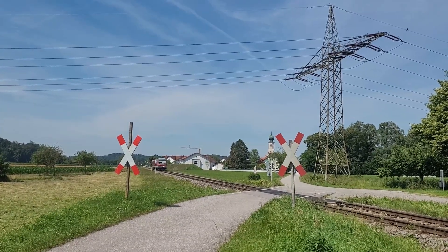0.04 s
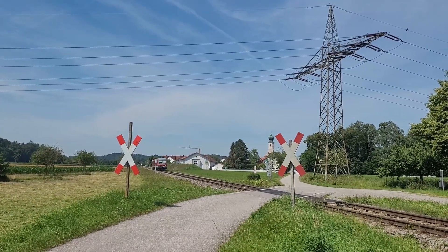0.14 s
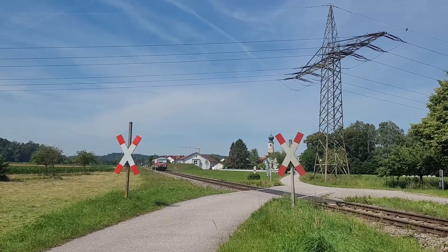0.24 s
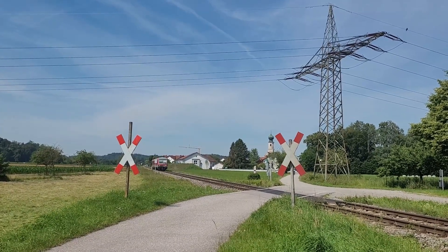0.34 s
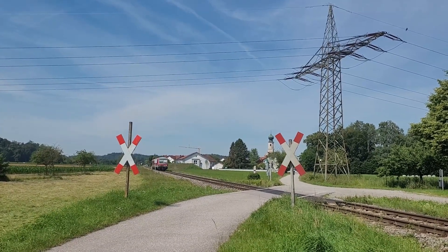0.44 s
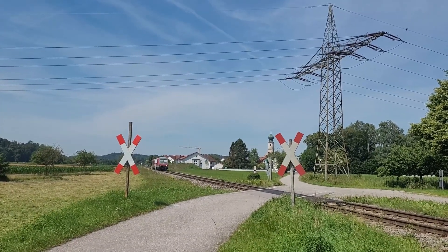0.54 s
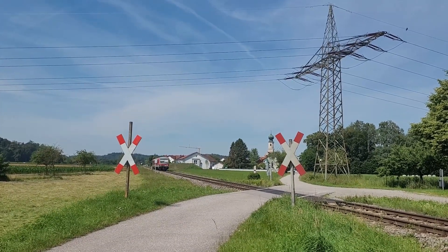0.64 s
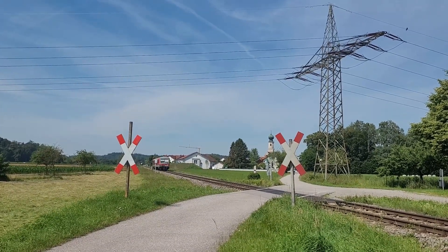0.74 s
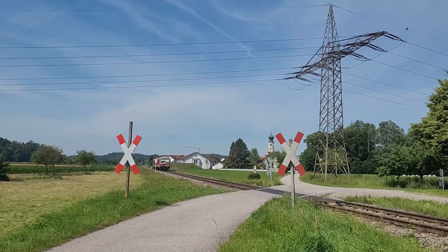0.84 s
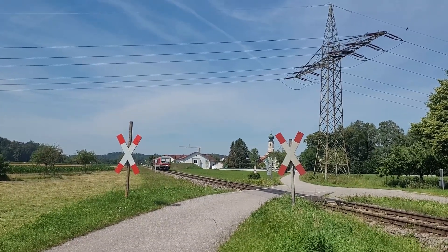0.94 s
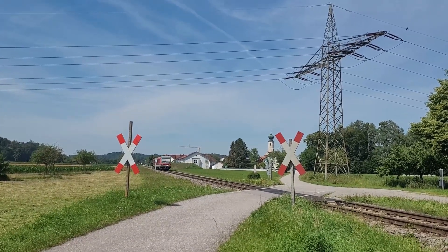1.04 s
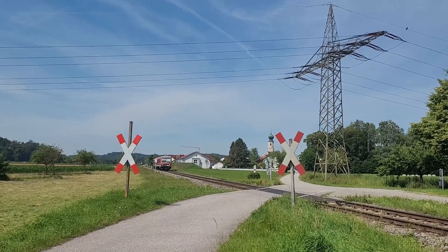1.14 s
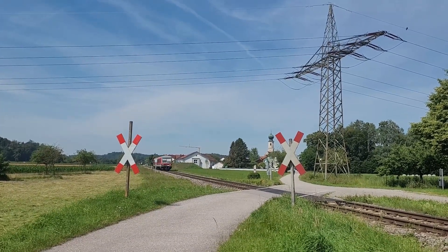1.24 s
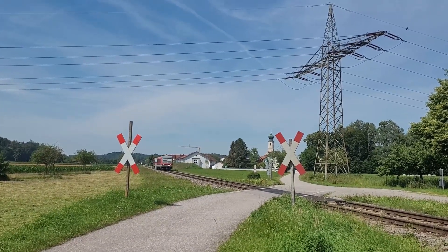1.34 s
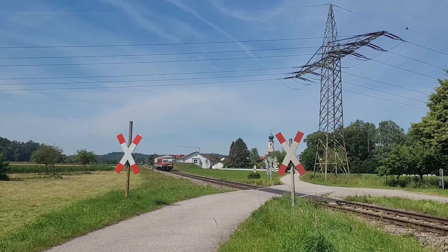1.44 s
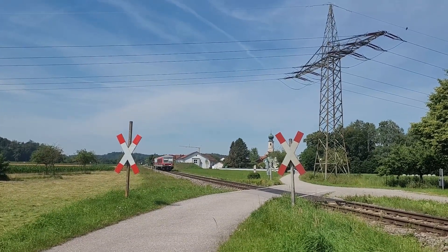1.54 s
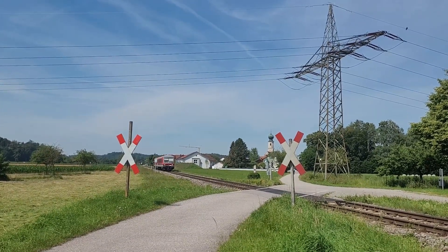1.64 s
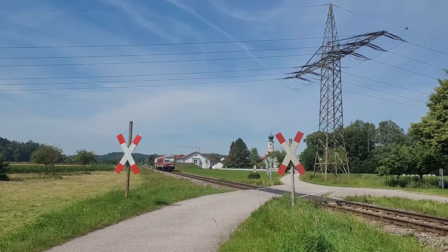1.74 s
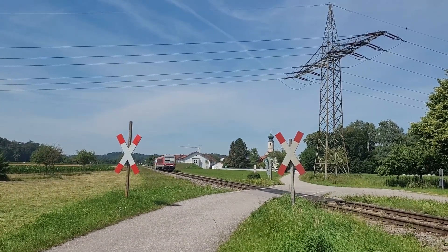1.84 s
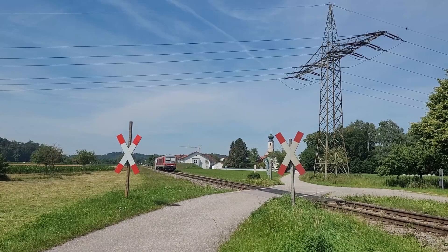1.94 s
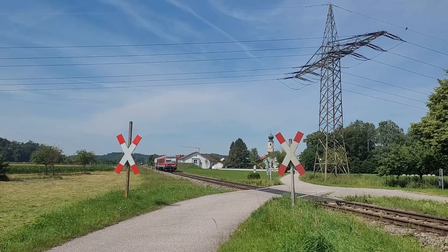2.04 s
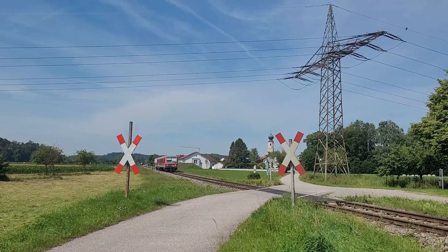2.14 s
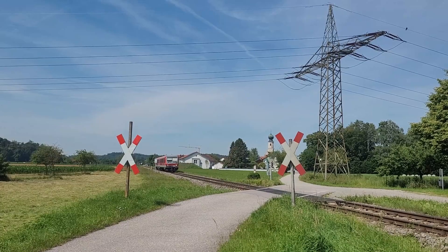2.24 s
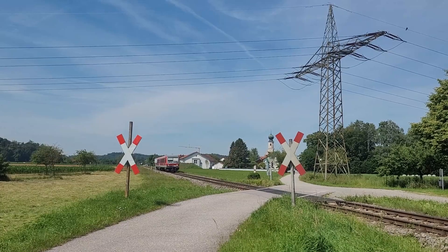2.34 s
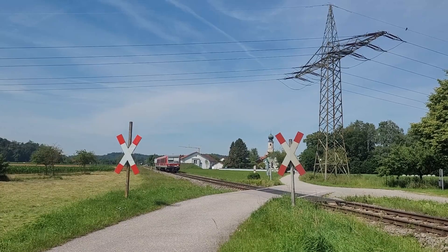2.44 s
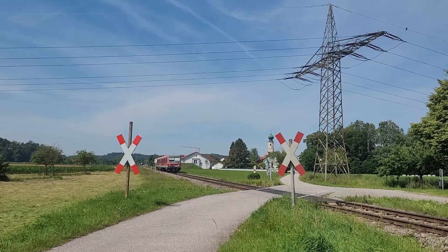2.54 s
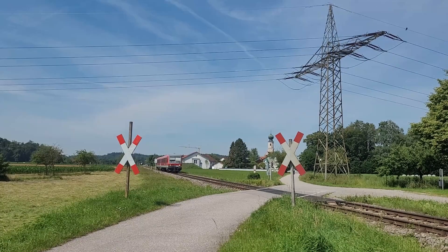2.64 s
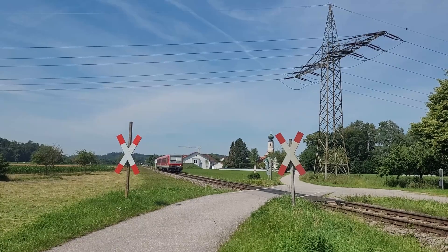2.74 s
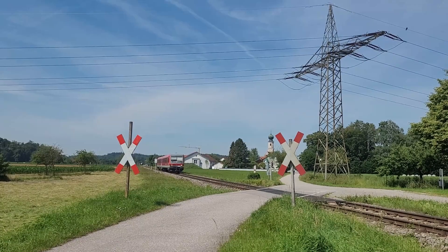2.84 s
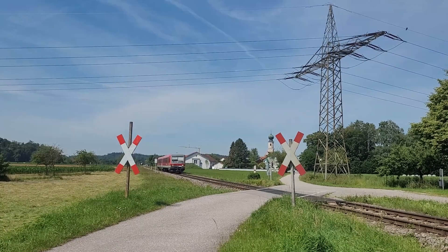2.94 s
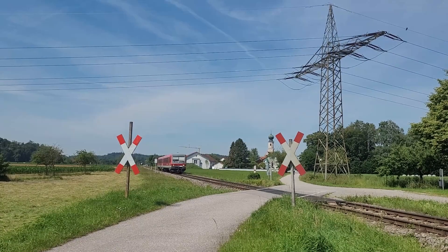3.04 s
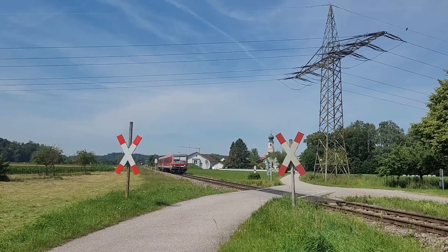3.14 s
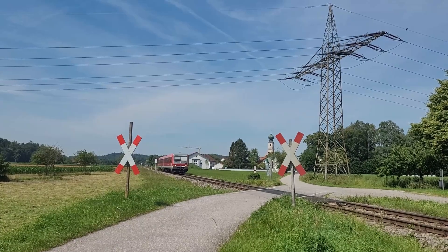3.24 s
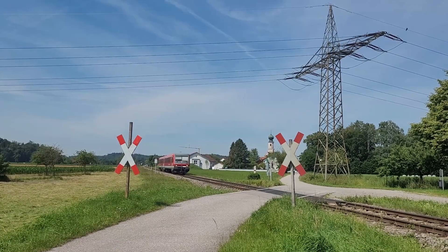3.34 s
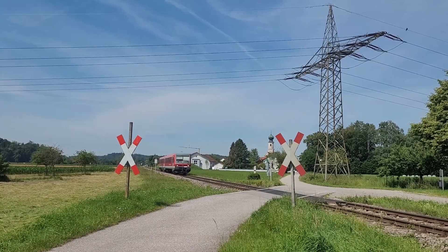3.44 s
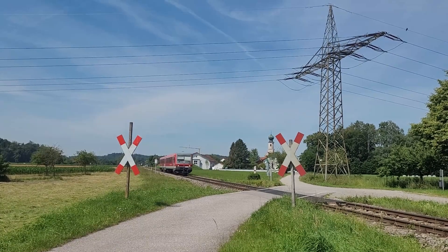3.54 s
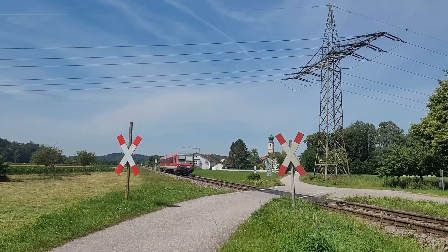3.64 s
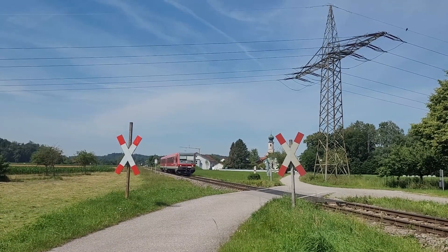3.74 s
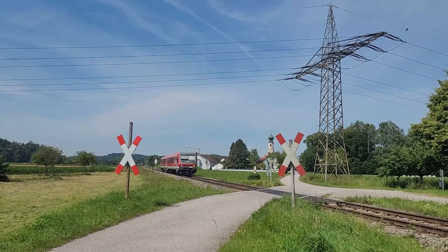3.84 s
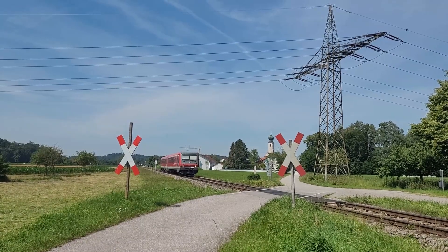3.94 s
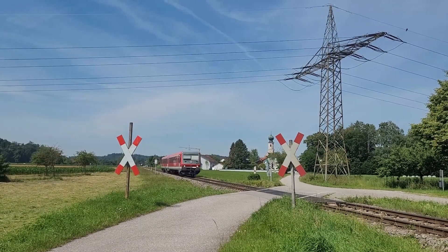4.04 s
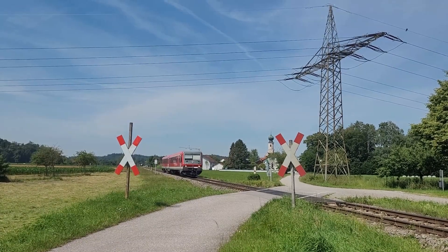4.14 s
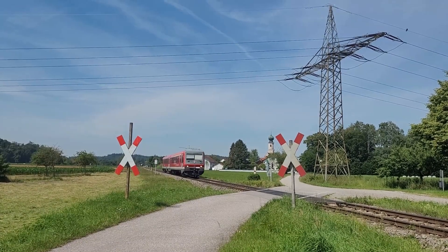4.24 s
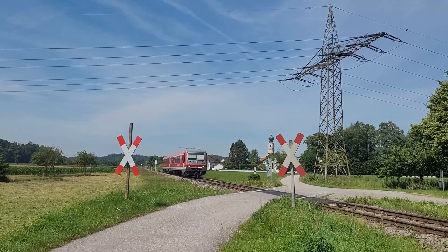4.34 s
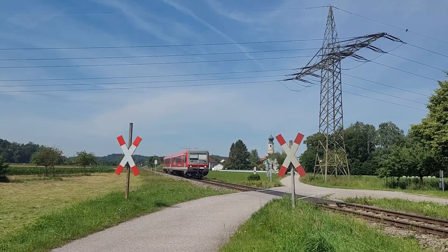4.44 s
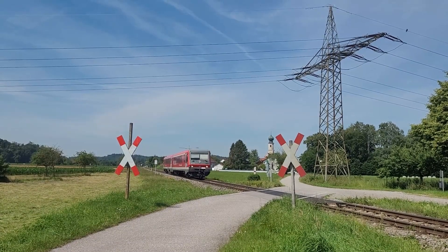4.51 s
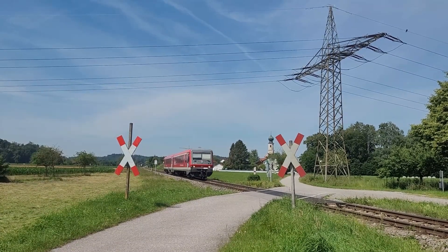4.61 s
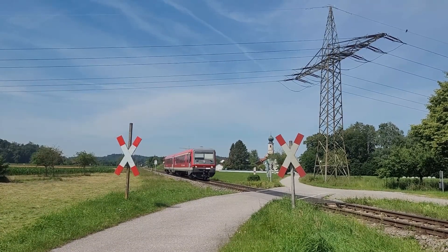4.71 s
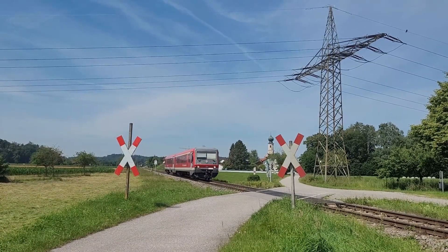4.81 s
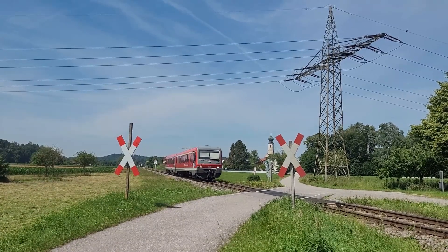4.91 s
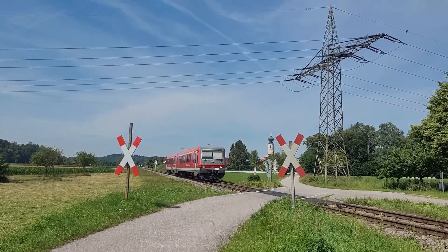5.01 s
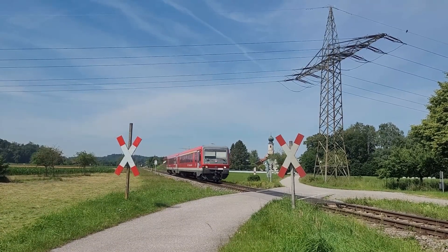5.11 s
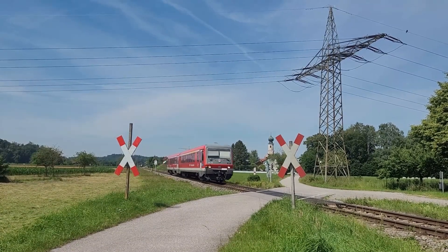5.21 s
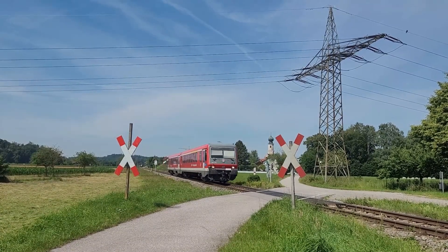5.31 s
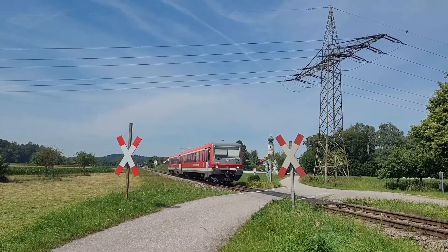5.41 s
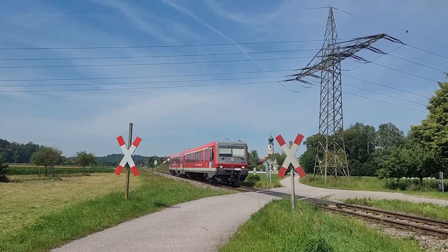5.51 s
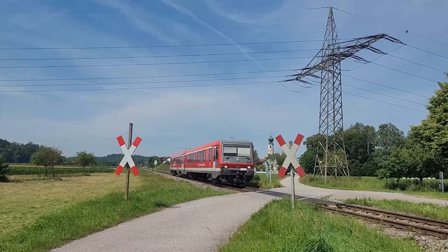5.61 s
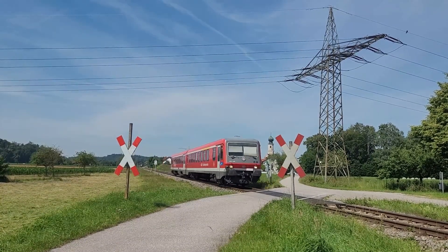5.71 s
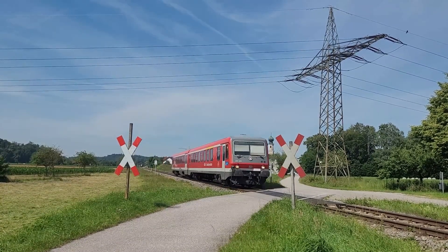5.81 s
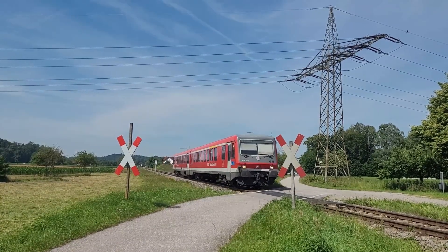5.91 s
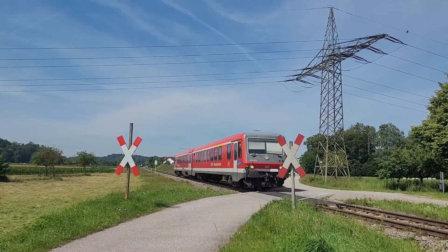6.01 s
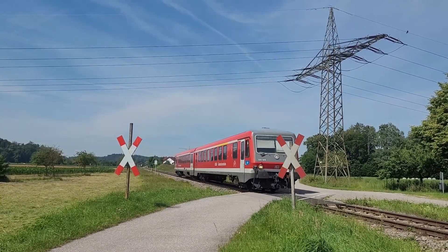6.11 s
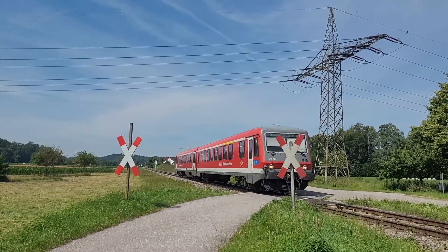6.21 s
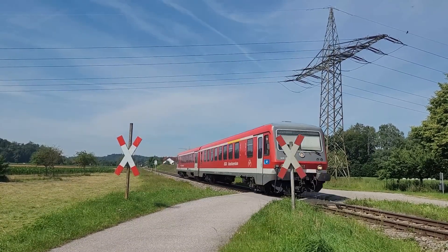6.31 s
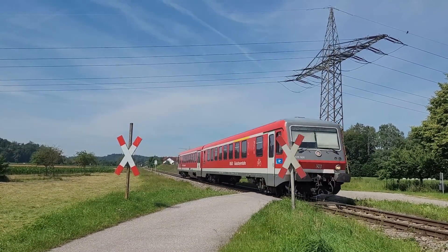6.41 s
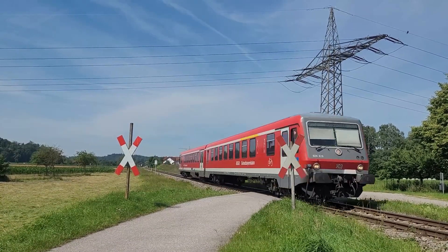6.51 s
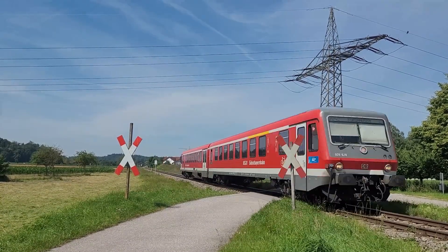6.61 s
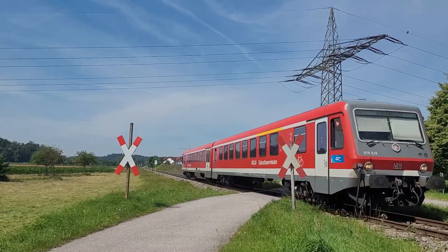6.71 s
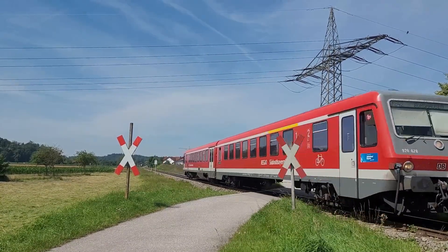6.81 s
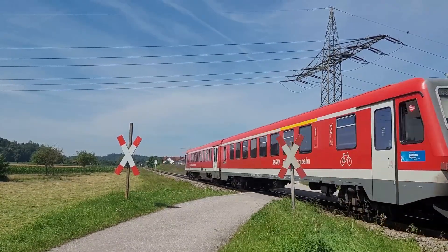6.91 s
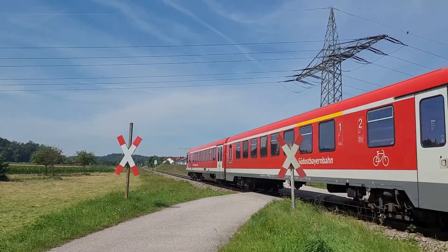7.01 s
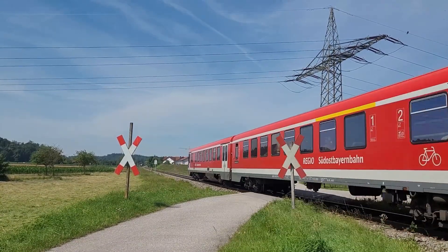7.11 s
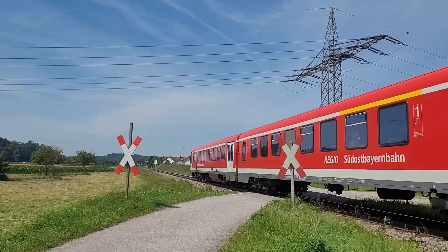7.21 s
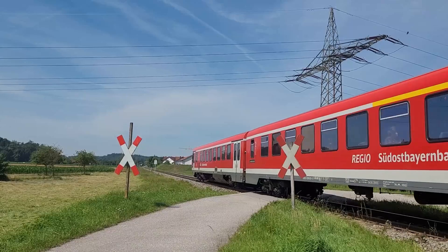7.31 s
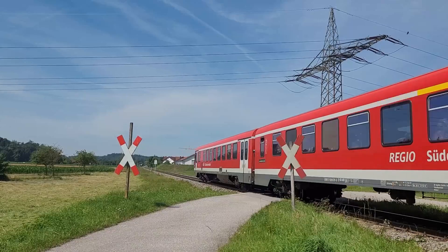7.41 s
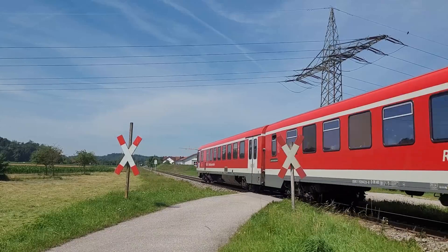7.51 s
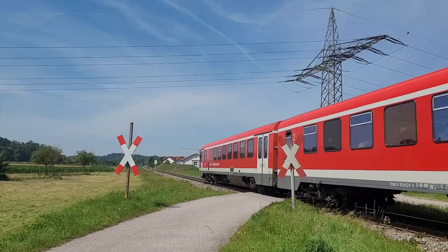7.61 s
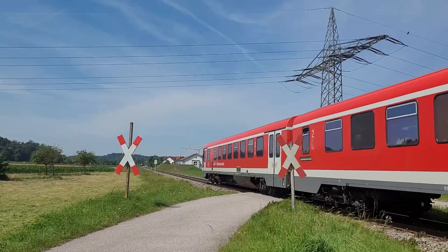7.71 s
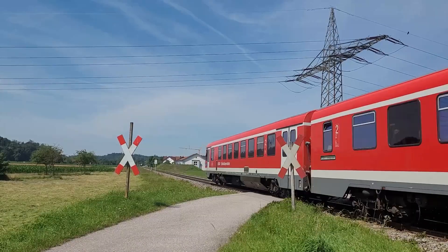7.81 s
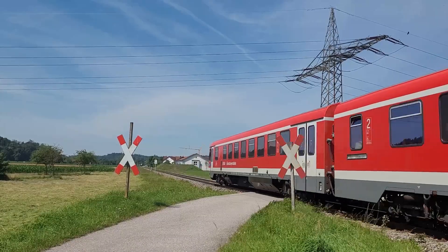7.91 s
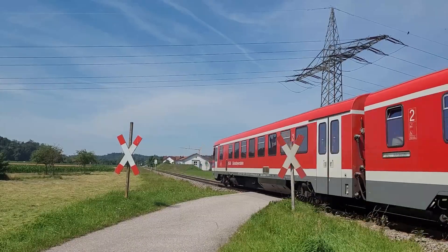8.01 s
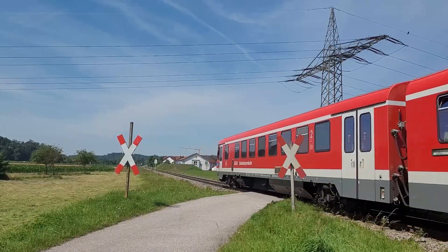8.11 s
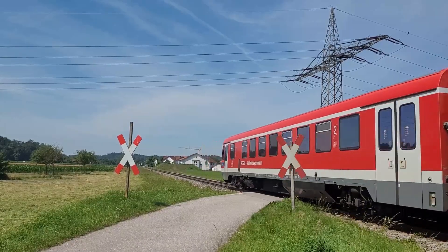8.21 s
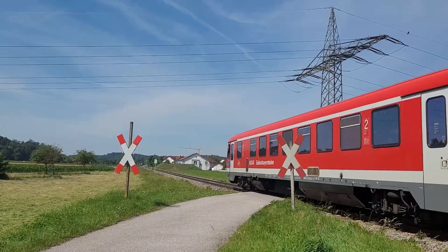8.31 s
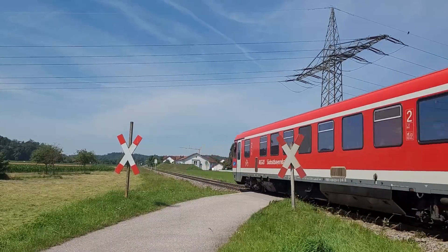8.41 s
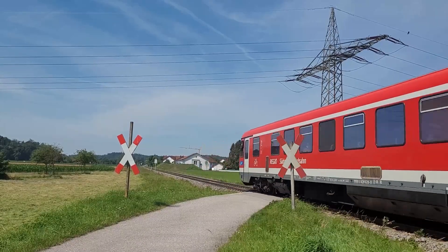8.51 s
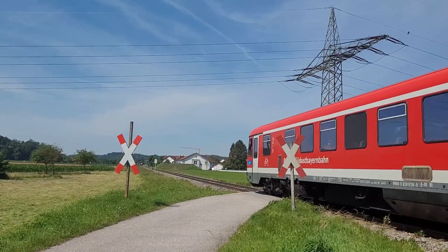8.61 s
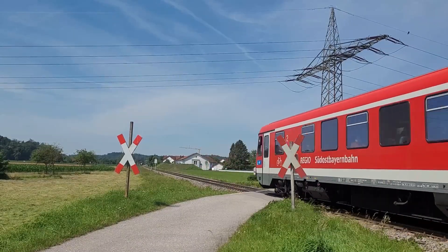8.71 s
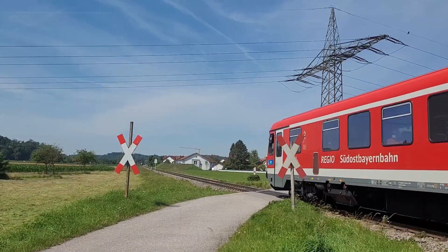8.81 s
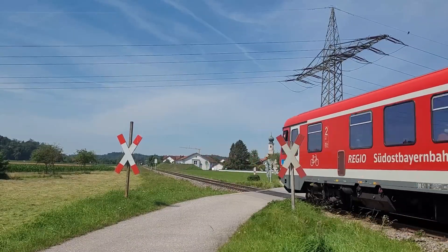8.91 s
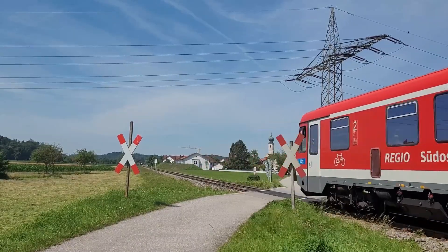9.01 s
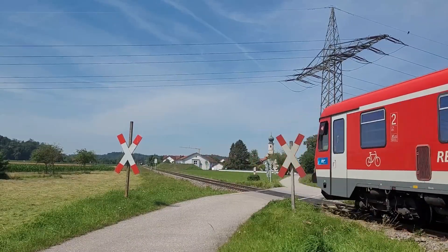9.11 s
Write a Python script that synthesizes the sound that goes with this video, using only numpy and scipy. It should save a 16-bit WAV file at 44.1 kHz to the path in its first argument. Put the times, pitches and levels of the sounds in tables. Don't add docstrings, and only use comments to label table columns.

```python
import sys
import numpy as np
from scipy import signal
from scipy.fft import rfft, irfft
from scipy.io import wavfile
from scipy.ndimage import uniform_filter1d, map_coordinates

SR = 44100
rng = np.random.default_rng(int(sys.argv[2]) if len(sys.argv) > 2 else 0)


def waveform_to_disk(signal):
    frames = np.transpose(np.atleast_2d(signal))
    scaled = np.clip(frames, -1, 1) * 32767
    samples = np.round(scaled).astype(np.int16)
    wavfile.write(sys.argv[1], SR, samples)


def undo_db(level):
    steps = np.asarray(level, float) / 20
    return 10 ** steps


N = 403515

# [t/s, level/dB, brightness/dB]
APPROACH = [(0, -64, 3), (.55, -60.5, 1.5), (1.5, -57, -5.5), (2.3, -52, -5.5), (3.4, -49.5, -3.5),
            (3.8, -50, -2.5), (4.4, -47, 0), (5.05, -43.5, 2), (5.7, -37.5, 1.5), (6.1, -37.5, 6.5),
            (6.4, -31.5, 1), (6.95, -24.5, 0), (7.3, -25, 1.5), (7.8, -22, -1.5), (8.2, -21, -4),
            (8.65, -21, 0), (9.15, -16.5, -1.5)]
# [t/s, nearness/0-1, lag of the left ear/ms]
PATH = [(0, 0.19, -0.16), (2.6, 0.03, -0.12), (3.8, 0.42, -0.12), (5.7, 0.53, -0.015), (6.2, 0.84, -0.014),
        (6.75, 0.77, 0.21), (7.3, 0.94, 0.46), (9.15, 1, 0.48)]
# [f/Hz, level/dB]
RUMBLE_COLOURS = [
    [(15, -43), (25, -14), (48, -1), (70, 5), (150, -7.5), (200, -20.5), (260, -73), (440, -120)],
    [(15, -39), (25, -10), (59, 4.5), (91, -2), (134, 2.5), (173, -3), (200, -15), (260, -51), (440, -120)],
]
RAIL_COLOURS = [
    [(120, -34), (200, 1.5), (361, -1), (437, -11), (594, -2.5), (807, -6.5), (885, -12), (1070, -7.5), (1250, -18), (1620, -54), (2750, -120)],
    [(120, -14), (200, -4.5), (291, -3.5), (418, -11.5), (585, 0.5), (833, -2), (892, -7.5), (1060, -2), (1180, -3.5), (1250, -54), (1620, -39), (2750, -120)],
    [(120, -27), (200, -10.5), (276, -4), (334, -13.5), (381, -8), (437, -14), (608, -5.5), (913, -13.5), (1080, -13), (1250, -18), (1620, -28.5), (2750, -120)],
]
WHEEL_COLOURS = [
    [(740, -37), (1250, -2), (1590, 3.5), (1850, -13.5), (2110, 6.5), (2410, -4.5), (2800, -6.5), (3060, -2.5), (3310, -23), (4000, -10), (5200, -52), (8800, -120)],
    [(740, -56), (1250, -31), (1500, -3), (1890, -15.5), (2010, -6), (2210, 3), (2470, -14), (3020, -11), (3390, -27), (4000, -16), (5200, -58), (8800, -120)],
    [(740, -51), (1250, -4), (1770, -3), (1950, -4), (2230, -4), (2530, -7.5), (2830, -1), (3140, -10), (4000, -15), (5200, -68), (8800, -120)],
]
HISS_COLOURS = [
    [(2060, -58), (3500, -5.5), (3880, -11), (4220, -8.5), (4810, 2), (5230, -5), (5730, -7), (6740, -15), (8240, -13.5), (10600, -17.5), (12500, -13.5), (14900, -26), (16000, -24), (16500, -51)],
    [(2350, -18), (4000, -7.5), (4480, 4), (4980, -0.5), (5440, -5), (6540, -9.5), (8150, -6.5), (9390, -10), (15000, -13.5), (16200, -34), (16500, -59)],
]
# [f/Hz, share/0-1]
AIMED = [(60, 0.97), (150, 0.98), (300, 0.89), (700, 0.87), (1400, 0.49), (2200, 0.52), (3500, 0.18),
         (7000, 0), (15000, 0)]
# [t/s, half width/s, level/dB]
RUMBLE_SWELLS = [(.25, .06, -6), (.7, 0.091, -4), (1.02, 0.065, -5), (1.2, .05, -9), (2.67, .05, -4),
                 (3.15, 0.078, 4.5), (3.75, .05, -9), (4.12, 0.076, 4), (4.8, 0.056, -1),
                 (5.58, 0.097, -7), (7.2, 0.11, 3), (7.76, 0.15, -4.5), (8.55, 0.093, 3.5)]
# [from t/s, to t/s, from f/Hz, to f/Hz, level over train/dB]
HUMS = [
    (15, [(8.45, 9.3, 610, 616, -10)]),
    (45, [(0, 5.7, 1052, 1053, -14), (2.4, 6.1, 819.5, 822, -9), (2.6, 4.6, 590, 589.3, -11.5), (7.7, 9.3, 241.3, 214.8, -11)]),
    (90, [(7.3, 9.3, 2200, 2310, -19.5), (7.0, 8.2, 2920, 2720, -23), (8.5, 9.3, 1945, 1937, -16.5), (8.8, 9.3, 400, 440, -12.5), (7.25, 7.85, 3720, 3680, -22), (7.1, 7.6, 8350, 8250, -40), (7.45, 7.75, 12400, 12400, -35), (7.95, 9.3, 8150, 8050, -34.5), (7.3, 8.3, 6050, 5400, -34.5), (1.5, 3.2, 370, 350, -12)]),
    (200, [(6.15, 6.6, 540, 600, -2.5), (6.5, 7.4, 640, 829.6, -10), (5.95, 6.8, 2200, 2150, -11.5), (8.1, 8.55, 3050, 2950, -19), (6.8, 7.3, 1050, 1050, -13.5), (7.6, 8.6, 652, 817.6, -10)]),
]
# [t/s, f/Hz, level/dB]
EXHAUST_FAR = [(.5, 261.7, -72.5), (3.2, 270, -65), (4.6, 288.3, -58.5), (6.0, 291, -50.5),
               (6.4, 290.6, -40.5), (6.95, 294, -36), (7.3, 286.6, -42)]
# [from t/s, to t/s, f/Hz, level/dB]
EXHAUST_GAPS = [(7.47, 7.58, 290, -31), (7.65, 7.79, 283, -27), (7.999, 8.07, 258, -27),
                (8.141, 8.3, 287.4, -28.5), (8.53, 8.777, 282.1, -22), (8.86, 8.937, 279.6, -18.5)]
# [t/s, peak level/dB, f/Hz]
JOINT_THUDS = [(0.033, -42, 76.5), (0.149, -51, 76), (0.308, -40, 78.6), (0.465, -38, 109),
               (0.475, -43, 200), (0.81, -38, 72.7), (1.282, -32, 59.2), (1.525, -35, 67.3),
               (1.62, -28, 68.6), (1.867, -45, 132), (2.013, -36, 78.1), (2.157, -41, 76),
               (2.27, -34, 94.2), (2.506, -27, 101), (2.644, -51, 78.1), (2.935, -44, 87),
               (3.441, -21, 56.7), (3.829, -25, 88.8), (4.3, -31, 56.5), (4.528, -26, 70.4),
               (4.75, -29, 61), (4.914, -22, 69), (5.386, -17.5, 69.6), (5.763, -29, 64.6), (6, -19, 67),
               (6.11, -13.5, 60), (6.705, -23, 78), (6.865, -12, 110), (7.04, -14.5, 75), (7.678, -16, 147),
               (8.271, -13, 72.7), (8.686, -10, 61.6), (8.94, -9, 111.1)]
# [t/s, peak level/dB, f/Hz]
RAIL_KNOCKS = [(5.695, -26.5, 587), (6.323, -28, 551), (6.379, -26, 625), (6.446, -20, 553),
               (6.558, -20, 576), (6.618, -13.5, 660), (6.663, -19, 669), (6.729, -15, 715),
               (6.77, -16, 818), (6.815, -15, 727), (6.848, -20, 573), (6.967, -12.5, 602),
               (7.099, -13, 647), (7.191, -12.5, 606), (7.258, -23, 743), (7.415, -16, 804),
               (7.465, -14, 489), (7.53, -15, 874), (7.56, -23, 570), (7.648, -20, 680), (7.681, -10, 563),
               (7.744, -8.5, 515), (7.85, -19, 690), (7.906, -17, 720), (7.955, -13, 732),
               (8.063, -8.5, 545), (8.236, -17, 753), (8.299, -16, 511), (8.339, -13, 764), (8.44, -9, 805),
               (8.507, -23, 594), (8.57, -25, 660), (8.614, -12, 495), (8.703, -26, 611), (8.761, -13, 610),
               (8.831, -9, 615), (8.866, -13, 640), (8.922, -18, 464), (8.953, -10, 614), (9.116, -15, 606)]
# [t/s, peak level/dB, f/Hz]
DISC_CLANKS = [(6.2059, -26, 2120), (6.3745, -26, 2120), (6.4469, -23, 2170), (6.4803, -28, 2270),
               (6.5626, -22, 2180), (6.8629, -27, 2100), (7.0939, -26, 2460), (7.2056, -20, 1990),
               (7.2785, -33, 2240), (7.3603, -24, 2190), (7.4381, -24, 2190), (7.5269, -18.5, 1990),
               (7.6127, -18, 2110), (7.705, -16, 1985), (7.7504, -19, 2160), (7.916, -28, 2170),
               (8.0427, -25, 2000), (8.1565, -35, 2240), (8.2393, -20.5, 2310), (8.381, -24, 2280),
               (8.4493, -30, 2170), (8.4802, -29, 1950), (8.5172, -27, 2280), (8.6055, -24, 1935),
               (8.7252, -24, 2232), (8.7845, -16.5, 2210), (8.8738, -24, 1960), (8.9362, -19, 2230),
               (8.9936, -23, 2030), (9.0973, -16, 2290)]
# [t/s, peak level/dB, f/Hz]
BODY_BOOMS = [(5.818, -20, 119), (6.008, -23, 168), (6.267, -20, 129), (6.339, -26, 283), (6.603, -20, 140),
              (6.649, -16.5, 294), (6.736, -23, 291), (6.908, -22, 131), (6.956, -16, 109),
              (7.041, -13, 252), (7.094, -11.5, 128), (7.172, -16, 248), (7.229, -17, 147),
              (7.294, -22, 154), (7.335, -20, 279), (7.415, -21, 138), (7.505, -26, 132), (7.684, -15, 130),
              (7.899, -14, 188), (8.089, -18, 267), (8.248, -10.5, 293.5), (8.326, -15, 158),
              (8.4, -12, 245), (8.485, -11, 218), (8.532, -5, 275.5), (8.622, -8, 280), (8.737, -12, 279),
              (8.833, -7, 238), (9.02, -13, 240), (9.103, -8, 121)]
# [t/s, peak level/dB, rattle level/dB]
AXLES = [
    (7.096, -27.5, 1.5),
    (7.211, -29, -1),
    (7.947, -31.5, 3),
    (8.055, -34, 7),
    (8.384, -33, 0.5),
    (8.495, -37.5, -2),
]
# [delay t/s, level/dB]
PLATE_RATTLE = [
    (0, 4),
    (0.023, -8.5),
    (0.042, -13),
    (.08, -17),
]
# [f/Hz, level/dB]
SPRAY_COLOUR = [(880, -32), (1500, -4.5), (2150, -3), (3280, -8), (4900, -7), (6620, -12.5), (8340, -9),
                (10000, -13), (11600, -12), (13600, -16.5), (15200, -13), (16000, -16), (16500, -45)]
# [t/s, peak level/dB, low knock level/dB]
LONE_TICKS = [
    (5.7334, -41, 2),
    (5.9978, -40.5, 5),
]
# [t/s, peak level/dB, low knock level/dB]
EARLY_TICKS = [(.002, -57, 0), (0.099, -59, -15), (.167, -60, -15), (.21, -58, -15), (.228, -68, -15)]
# [delay t/s, level/dB, low knock level/dB]
TRIPLET = [(0, -2.5, 1.5), (0.0386, -0.5, -4), (0.09, -4, 1)]
RUN_UP = [
    (-.071, -5, 0),
    (-.058, -5.5, 1),
    (-.026, -6, -14),
    (0, 0, -0.5),
]
PAIR = [
    (-.0435, -4, -11),
    (0, 1, -10),
]
# [t/s, peak level/dB]
TRIPLET_STARTS = [(2.0348, -46.5), (2.605, -45), (3.5927, -45)]
RUN_UP_STARTS = [(3.7863, -45), (3.9115, -42.5), (4.0362, -43), (4.1599, -43.5), (4.7641, -42.5)]
# [f/Hz, level/dB]
CRACK_COLOUR = [(4000, -4), (5200, 1), (6500, -5.5), (8400, 0), (10000, -5), (11700, 0), (13000, -2),
                (16000, -2)]
# [f/Hz, level/dB, T60/s]
KNOCK_MODES = [(2310, -2, 0.022), (2670, -2.5, 0.022), (3070, -5, 0.025)]
# [t/s, length/s, from f/Hz, bend f/Hz, to f/Hz, level/dB]
BIRD_NOTES = [(.015, .068, 2060, 2010, 1990, -58), (.175, .22, 1710, 1520, 1480, -71.5),
              (.455, .18, 1950, 1975, 1930, -63), (.725, .125, 2470, 2460, 2430, -64),
              (1.285, .03, 2640, 2670, 2660, -68), (1.32, .04, 2070, 2000, 1880, -63),
              (1.485, .045, 2290, 2220, 2080, -62)]
# [t/s, length/s, from f/Hz, to f/Hz, level/dB]
WARBLES = [
    (0, 1.64, 2162, 2107, -72.5),
    (0.663, 0.077, 2200, 2100, -65),
    (1.051, 0.13, 2050, 2005, -68),
    (1.61, .07, 2100, 2120, -67),
]
# [t/s, f/Hz, level/dB]
CHIRPS = [(1.12, 5050, -70), (1.635, 5350, -70), (1.67, 5100, -70), (1.7, 4050, -68), (2.15, 4700, -68),
          (2.19, 3950, -72), (2.73, 4750, -68), (2.78, 4100, -66), (3.14, 4770, -65), (3.675, 3200, -62),
          (4.27, 3830, -60.5)]
# [f/Hz, level/dB]
WIND_PUFF = [(0, -60), (.44, -50), (.48, -43), (.52, -54), (.7, -56)]
BUFFET_COLOUR = [(20, -12), (60, 12), (130, -3), (280, -15), (500, -17), (1000, -90)]
# [f/Hz, level/dB]
FIELD_COLOUR = [(1060, -39), (1800, -8.5), (2130, -8.5), (3200, -16), (3890, -12), (6970, -43.5),
                (8620, -21.5), (10500, -48), (12800, -14), (15000, -13.5), (16000, -22), (16500, -45)]
# [t/s, half width/s, level/dB]
GUSTS = [
    (3.9, .5, 2),
    (5.87, 0.14, 9.5),
    (6.5, 0.23, 8),
    (8.9, .25, 9),
]
# [f/Hz, level/dB]
BASS_SIDE = [(40, 6.5), (130, 1.5), (260, -5), (500, 0)]

MIDWAY_DB = -40


def unit(x):
    return x / np.sqrt(np.mean(x ** 2) + 1e-20)


def along(points, hz):
    f, v = np.transpose(points)
    return np.interp(np.log(hz + 1), np.log(f + 1), v)


def curves(rows, outside=None):
    s, *cols = np.transpose(rows)
    return [np.interp(np.arange(N) / SR, s, c, outside, outside) for c in cols]


def wobble(rate, size=N):
    knots = rng.standard_normal(int(size * rate / SR) + 4)
    return map_coordinates(knots, [np.arange(size) * rate / SR])


def bumps(rows):
    t = np.arange(N) / SR
    return sum(db * np.exp(-((t - s) / wide) ** 2) for s, wide, db in rows)


def heard(x, turn=1):
    half = turn * curves(PATH)[1] * SR / 2000
    return np.array([map_coordinates(x, [np.arange(N) + side * half], mode="nearest") for side in (-1, 1)])


def echoed(x, wet_db, t60):
    tail = rng.standard_normal((2, SR // 3)) * undo_db(-60 * np.arange(SR // 3) / SR / t60)
    wet = signal.fftconvolve(np.atleast_2d(x), tail / np.linalg.norm(tail[0]), axes=1)
    return x + undo_db(wet_db) * wet[:, :N]


def rush(colours, patchy_db, turn, size=1024, at=(0, 1)):
    hz, t, z = signal.stft(rng.standard_normal((3, N)), SR, nperseg=size)
    field = rng.standard_normal(z.shape[1:])
    field = uniform_filter1d(uniform_filter1d(field, 4, axis=0), 12, axis=1)
    nearness = np.interp(t, *np.transpose(PATH)[:2])
    stage = np.interp(nearness, at, np.linspace(0, len(colours) - 1, len(at)))
    blend = [np.outer(along(c, hz), np.clip(1 - abs(stage - k), 0, 1)) for k, c in enumerate(colours)]
    gain = undo_db(sum(blend))
    gain = gain / np.sqrt(np.mean(gain ** 2, axis=0)) * undo_db(patchy_db * unit(field))
    aimed = np.clip(along(AIMED, hz), 0, 1)[:, None]
    shares = np.sqrt([aimed, 1 - aimed, 1 - aimed])
    parts = signal.istft(z * gain * shares, SR, nperseg=size)[1][:, :N]
    return unit(heard(parts[0], turn) + parts[1:])


def whistle(rows, width_hz=0, flutter_db=0, flutter_rate=25, overtone=0, even=0):
    s, hz, db = np.transpose(rows)
    t = np.arange(max(round(s[0] * SR), 0), min(round(s[-1] * SR), N)) / SR
    fade = np.clip(np.minimum(t - s[0], s[-1] - t) / 0.007, 0, 1)
    smear = wobble(width_hz, len(t)) + 1j * wobble(width_hz, len(t)) if width_hz else 1
    smear = smear / np.abs(smear) ** even
    turn = np.exp(2j * np.pi * np.cumsum(np.interp(t, s, hz)) / SR)
    level = undo_db(np.interp(t, s, db) + 2.5 + flutter_db * wobble(flutter_rate, len(t)))
    out = np.zeros(N)
    out[round(t[0] * SR):][:len(t)] = fade * level * np.real(smear * (turn + overtone * turn ** 2))
    return out


def rolling():
    rail_db, bright_db = curves(APPROACH)
    rumble_db = -37 + 0.65 * (rail_db - MIDWAY_DB) + 0.59 * wobble(3.7)
    rumble_db = rumble_db - 28 * (np.arange(N) < .42 * SR) + bumps(RUMBLE_SWELLS)
    lead_db = bumps([(6.54, .3, 5.5)])
    wheel_db = rail_db - 9 + 0.71 * bright_db + lead_db + 1.0 * wobble(8)
    hiss_db = rail_db - 16.5 + bright_db + 0.2 * wobble(6.6)
    throb = wobble(16) + 0.74 * wobble(30)

    rumble = undo_db(rumble_db + 1.24 * throb + 3.16 * np.tanh(wobble(14)))
    rumble = rumble * rush(RUMBLE_COLOURS, patchy_db=1.5, turn=0.092, size=4096)
    rail = undo_db(rail_db + 0.33 * throb + 0.82 * wobble(40))
    rail = rail * rush(RAIL_COLOURS, patchy_db=2.0, turn=0.66, at=(0, .5, .8), size=2048)
    wheel = undo_db(wheel_db + 0.16 * throb + 1.25 * wobble(50))
    wheel = wheel * rush(WHEEL_COLOURS, patchy_db=2.5, turn=1.0, at=(.5, .8, 1))
    hiss = undo_db(hiss_db + .4 * throb + .4 * wobble(60))
    hiss = hiss * rush(HISS_COLOURS, patchy_db=2.8, turn=1, at=(.8, 1))
    return rumble + rail + wheel + hiss


def hum_glide(a, b, f, g, db):
    rise_s, rise_db = 0.41, 2.5
    return [(a, f, db - rise_db), (a + rise_s, f + (g - f) * rise_s / (b - a), db), (b, g, db)]


def engine():
    hums = sum(whistle(hum_glide(*row), width_hz, flutter_db=1.5, flutter_rate=8.2, even=0.4)
               for width_hz, rows in HUMS for row in rows)
    width_hz = 9
    exhaust = whistle(EXHAUST_FAR, 2 * width_hz, flutter_db=1.5, flutter_rate=9, even=0.32)
    for a, b, hz, db in EXHAUST_GAPS:
        sag = [(a, hz, db), (b, hz - 3, db - 1.5)]
        exhaust = exhaust + whistle(sag, width_hz, flutter_db=1.3, flutter_rate=29, even=0.75)
    return heard(exhaust + undo_db(curves(APPROACH)[0]) * hums, turn=0.77)


def joints():
    out, t = np.zeros(N + SR), np.arange(SR // 4) / SR
    for s, db, hz in JOINT_THUDS:
        shape = undo_db(db + 0.5 - 60 * t / 0.12) * (1 - np.exp(-t / 0.011))
        out[round(s * SR):][:len(t)] += shape * np.sin(2 * np.pi * hz * t)
    return heard(out[:N], turn=.3)


def blows(rows, level_db, rise_s, t60, blur_hz):
    out, t = np.zeros(N + SR), np.arange(SR // 5) / SR
    for s, db, hz in rows:
        drift = 2 * np.pi * np.cumsum(blur_hz * wobble(59.6, len(t))) / SR
        shape = undo_db(db + level_db - 60 * t / t60) * (1 - np.exp(-t / rise_s))
        out[round(s * SR):][:len(t)] += shape * np.sin(2 * np.pi * hz * t + drift)
    return out[:N]


def knocks():
    rail = blows(RAIL_KNOCKS, level_db=-0.5, rise_s=0.0051, t60=0.15, blur_hz=59.7)
    discs = blows(DISC_CLANKS, level_db=-4, rise_s=0.0018, t60=0.11, blur_hz=120)
    body = blows(BODY_BOOMS, level_db=-2, rise_s=0.0064, t60=0.16, blur_hz=25.2) * undo_db(-0.5)
    return echoed(heard(.8 * rail + discs + body, turn=0.92), wet_db=-11.5, t60=.4)


def grit_burst(u):
    return np.where(u < 0, np.exp(-(u / 0.023) ** 2), undo_db(-60 * np.maximum(u, 0) / 0.22))


def axles():
    t = np.arange(N) / SR
    swell = sum(undo_db(db + after_db + rattle_db * (delay > 0)) * grit_burst(t - s - delay)
                for s, db, rattle_db in AXLES for delay, after_db in PLATE_RATTLE)
    grain = undo_db(0.92 * wobble(45) + 1.3 * wobble(300))
    return swell * grain * rush([SPRAY_COLOUR], patchy_db=1.7, turn=0.894, size=512)


def tick_times():
    pair_starts = [(4.2922 + k * .2, -47) for k in range(6)]
    played = [(TRIPLET_STARTS, TRIPLET), (RUN_UP_STARTS, RUN_UP), (pair_starts, PAIR)]
    return [(s + delay, db + step_db, knock_db)
            for starts, figure in played for s, db in starts for delay, step_db, knock_db in figure]


def ticks():
    crack, knock, t = np.zeros((2, N + SR)), np.zeros(N + SR), np.arange(SR // 16) / SR
    shape = undo_db(-60 * t / 0.027) * (1 - np.exp(-t / 0.0032))
    for s, db, knock_db in tick_times() + LONE_TICKS + EARLY_TICKS:
        start = round(s * SR)
        level = undo_db(db + 9.0 + rng.normal(0, 1.3))
        crack[:, start:][:, :len(t)] += level * shape * rng.standard_normal((2, len(t)))
        ring = sum(undo_db(mode_db + rng.normal(0, 2.5) - 60 * t / t60)
                   * np.sin(2 * np.pi * hz * rng.normal(1, .04) * t) for hz, mode_db, t60 in KNOCK_MODES)
        knock[start:][:len(t)] += undo_db(db + knock_db) * ring * (1 - np.exp(-t / 0.00073))
    hz = np.fft.rfftfreq(N + SR, 1 / SR)
    colour = undo_db(along([(2500, -26)] + CRACK_COLOUR, hz))
    bright = irfft(rfft(crack) * colour, N + SR)[:, :N]
    return echoed(bright + knock[:N], wet_db=-4.5, t60=0.72)


def birds():
    notes = np.zeros(N)
    for s, long, f, bend, g, db in BIRD_NOTES:
        path = [(s, f, db), (s + 0.304 * long, bend, db), (s + long, g, db - 4.0)]
        notes += whistle(path, flutter_db=1.5, flutter_rate=30)
    for s, long, f, g, db in WARBLES:
        path = [(s, f, db), (s + 0.354 * long, .4 * f + .6 * g, db), (s + long, g, db - 2)]
        notes += whistle(path, width_hz=240)
    chirps = np.zeros(N)
    for s, f, db in CHIRPS:
        fall = [(s, f, db), (s + 0.0344, f * (1 - 0.098), db)]
        chirps += whistle(fall, width_hz=450, even=.3, overtone=0.15)
    return echoed(notes + undo_db(-3.0) * chirps, wet_db=-10, t60=0.4)


def wind():
    level_db = curves(WIND_PUFF, outside=-120)[0] + [[3], [-11]]
    return undo_db(level_db) * rush([BUFFET_COLOUR], patchy_db=2.0, turn=0)


def field_air():
    air_db = -59.5 + 0.43 * (curves(APPROACH)[0] - MIDWAY_DB) + bumps(GUSTS) + 0.3 * wobble(5.7)
    return undo_db(air_db) * rush([FIELD_COLOUR], patchy_db=-2.0, turn=0)


def scene():
    train = rolling() + engine() + joints() + knocks() + axles()
    return train + ticks() + birds() + wind() + field_air()


def low_pass(x):
    return signal.sosfilt(signal.butter(12, 17080, fs=SR, output="sos"), x)


def record(dry):
    hz = np.fft.rfftfreq(N + SR, 1 / SR)
    band = (hz < 15800) / np.sqrt(1 + (41 / (hz + 1)) ** 6)
    tilt = undo_db(np.outer([-1, 1], along([(5000, 0), (8000, 0.6), (15000, 1.0)], hz)))
    side = rfft(dry[0] - dry[1], N + SR) / 2 * (undo_db(along(BASS_SIDE, hz)) - 1)
    spectrum = (rfft(dry, N + SR) + [side, -side]) * band * tilt
    return low_pass(irfft(spectrum, N + SR)[:, :N])


dry = scene()
out = record(dry)
waveform_to_disk(out)
```